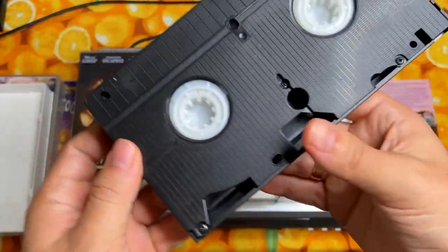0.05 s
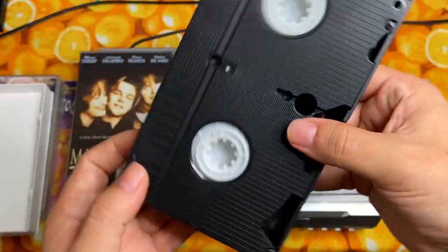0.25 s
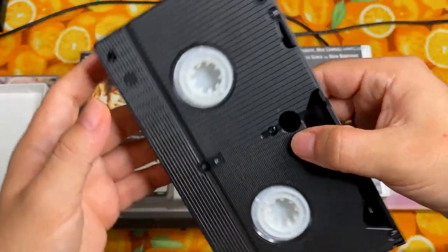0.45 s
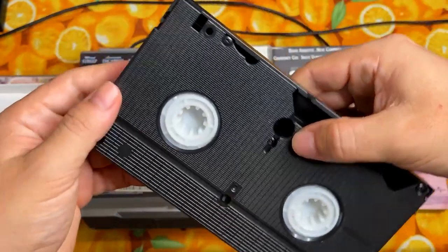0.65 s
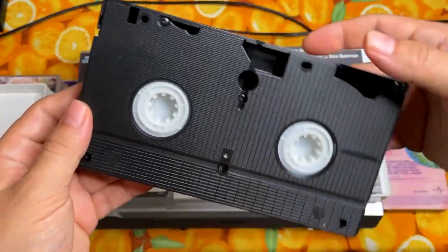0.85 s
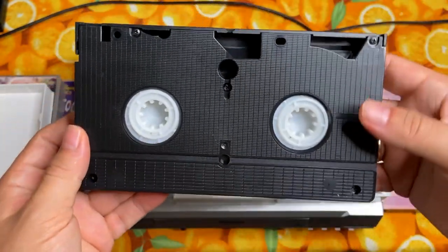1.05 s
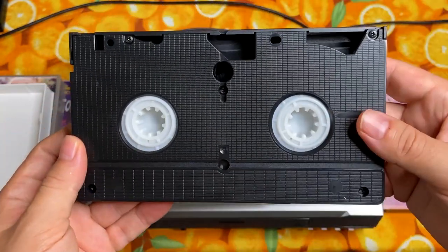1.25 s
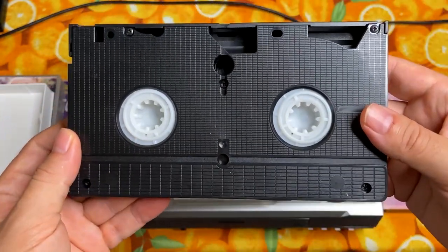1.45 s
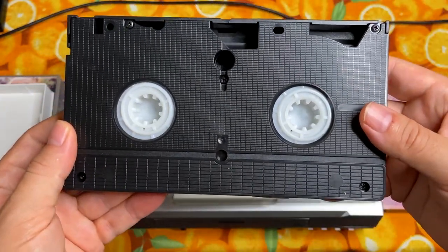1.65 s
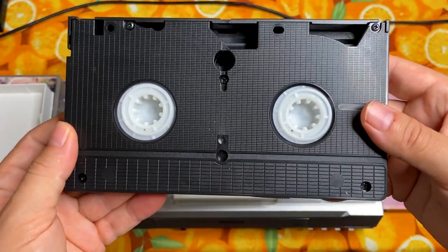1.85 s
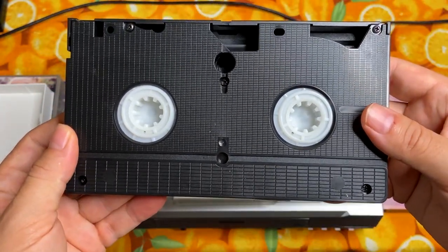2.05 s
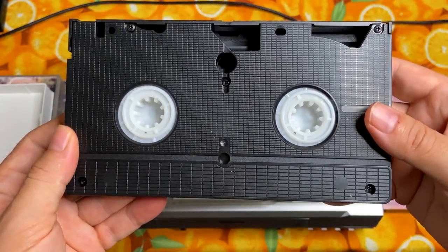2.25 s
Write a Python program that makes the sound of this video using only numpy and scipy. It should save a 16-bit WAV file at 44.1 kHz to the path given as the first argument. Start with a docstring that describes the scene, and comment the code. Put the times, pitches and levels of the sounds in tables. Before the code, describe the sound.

Hollow plastic clacks come from a videotape being handled near the microphone, with light rubbing and a dull bump. After the sharpest clack the handling dies down, leaving small ticks and the faint hiss of a small room.

```python
"""In a small quiet room, close above a table, a hollow plastic cassette is turned over in the hands.
Its loose reels and flap strike the shell, and each impact excites damped resonances. Fingers rub
by stick-slip friction, the hands bump it softly, and sliding plastic squeaks once. The table reflects
the clacks and the walls reverberate; under it all lie a low rumble, faint hiss and a thin whine."""
import sys
import numpy as np
from scipy import signal
from scipy.fft import rfft, irfft, next_fast_len
from scipy.io import wavfile
from scipy.ndimage import uniform_filter1d, map_coordinates

SR = 44100
rng = np.random.default_rng(int(sys.argv[2]) if len(sys.argv) > 2 else 0)


def waveform_to_disk(signal):
    """Save audio, clipped to [-1, 1], as 16-bit WAV at the path in sys.argv[1]."""
    frames = np.transpose(np.atleast_2d(signal))
    scaled = np.clip(frames, -1, 1) * 32767
    samples = np.round(scaled).astype(np.int16)
    wavfile.write(sys.argv[1], SR, samples)


N = 105840


def amp(db):
    """Decibels to gain."""
    return 10 ** (np.asarray(db) / 20)


def unit(x):
    """Normalisation to rms 1."""
    return x / np.sqrt(np.mean(x ** 2) + 1e-20)


def along(points, hz):
    """Interpolation of (Hz, value) points on a log axis."""
    f, v = np.transpose(points)
    return np.interp(np.log(hz + 1), np.log(f + 1), v)


def fade(t, t60):
    """Exponential decay by 60 dB in t60."""
    return np.exp(-np.log(1000) * t / np.maximum(t60, 1e-4))


def wobble(rate):
    """Spline interpolation of random knots, rate a second."""
    return map_coordinates(rng.standard_normal(N // 8), [np.arange(N) * rate / SR], mode="wrap")


def add(track, s, sound):
    """Superposition of a sound on a track at time s."""
    i = max(round(s * SR), 0)
    track[..., i:i + sound.shape[-1]] += sound[..., :max(N - i, 0)]


def filtered(x, response):
    """Linear filtering by a complex frequency response."""
    m = next_fast_len(N + SR // 2)
    return irfft(rfft(x, m) * response(np.fft.rfftfreq(m, 1 / SR)), m)[..., :N]


def coloured(x, points, size=16384):
    """Minimum-phase filter through (Hz, dB) points, for short sounds."""
    cepstrum = irfft(np.log(amp(along(points, np.fft.rfftfreq(size, 1 / SR)))))
    cepstrum[1:size // 2] *= 2
    cepstrum[size // 2 + 1:] = 0
    return irfft(rfft(x, size) * np.exp(rfft(cepstrum)))[:len(x)]


def noise(spectrum):
    """Spectral shaping of white noise; rms 1."""
    return unit(filtered(rng.standard_normal(N), lambda hz: amp(along(spectrum, hz))))


def dying(t60s, length, size):
    """Frequency-dependent damping of a noise burst."""
    hz, t, z = signal.stft(rng.standard_normal(length), SR, nperseg=size)
    return signal.istft(z * fade(t, along(t60s, hz)[:, None]), SR, nperseg=size)[1][:length]


def evened(x, order=121):
    """Whitening: flattens the broad spectrum, keeping its fine peaks; energy 1."""
    z = rfft(x, 2 * len(x))
    return irfft(z / np.sqrt(np.abs(uniform_filter1d(np.abs(z) ** 2, order)) + 1e-12))[:len(x)]


# rumble envelope (time [s], level [dB])
RUMBLE_LEVEL = [(0.0, -54.5), (0.08, -70), (0.16, -49), (0.37, -67), (0.63, -59), (0.68, -50),
                (0.89, -62.5), (1.14, -52.5), (1.43, -61.5), (1.49, -62.5), (2.32, -63.5), (2.4, -73.5)]
# its spectrum (frequency [Hz], density [dB])
RUMBLE = [(20, -24.5), (35, -9), (52, 1), (70, -2.5), (110, -10), (200, -21), (400, -57.5)]
def rumble(gain_db=-0.5):
    """Amplitude modulation: low noise swells and sinks."""
    level_db = np.interp(np.arange(N) / SR, *np.transpose(RUMBLE_LEVEL))
    return amp(level_db + gain_db) * noise(RUMBLE)


# hiss spectrum (frequency [Hz], density [dB])
HISS = [(50, -21.5), (120, -5), (170, -10), (370, -12.5), (500, -15.5), (1200, -26), (1750, -27.5),
        (2300, -30), (4000, -34), (7000, -35.5), (9000, -36.5), (12000, -40), (13500, -58), (16000, -69.5)]
# its stereo width (frequency [Hz], side over mid [dB])
HISS_WIDTH = [(100, -5.5), (300, -8.5), (900, -1.5), (4000, -12), (10000, -13.5)]
def hiss(mid_db=-68.5):
    """Partial coherence: the channels share one noise and take a second in opposite phase."""
    side = filtered(noise(HISS), lambda hz: amp(along(HISS_WIDTH, hz)))
    return amp(mid_db) * (noise(HISS) + np.array([side, -side]))


# whine tones (frequency [Hz], level [dB])
WHINE = [(1745, -82), (1700, -85.5)]
# their brief swell (time [s], gain [dB])
WHINE_SWELL = [(0, 0.5), (1.55, 0), (1.66, 5), (1.82, -1.5), (1.95, 0), (2.4, 0)]
def whine():
    """Phase modulation: two faint, close tones waver at random."""
    t = np.arange(N) / SR
    tones = sum(amp(db) * np.sqrt(2) * np.sin(2 * np.pi * hz * t + 0.91 * wobble(35))
                for hz, db in WHINE)
    return tones * amp(np.interp(t, *np.transpose(WHINE_SWELL)))


# rubbing strokes, and brief soft noise just before two clacks (start [s], duration [s], level [dB])
RUBS_AND_PUFFS = [(0.053, 0.046, -51.5), (0.118, 0.022, -50.5), (0.151, 0.086, -53), (0.273, 0.16, -60.5),
                  (0.395, 0.021, -47.5), (0.537, 0.049, -60), (0.571, 0.064, -54.5), (0.647, 0.021, -46),
                  (0.725, 0.05, -58.5), (.812, .02, -58.5), (.84, 0.057, -62.5), (0.888, 0.00428, -43.5),
                  (1.088, 0.028, -51), (1.162, 0.05, -58)]
# their spectrum (frequency [Hz], density [dB])
RUB_SPECTRUM = [(100, -7), (300, 8), (500, -0.5), (800, 2), (2000, -1.5), (4500, -9.5), (8000, -15.5),
                (11500, -17.5), (15000, -38)]
def rubbing(rise_s=.008, fall_s=.035, grains_per_s=900, grain_db=2):
    """Friction noise: grainy rubbing strokes; the same noise also sounds briefly before two clacks."""
    t = np.arange(N) / SR
    envelope = np.zeros(N)
    for start, length, db in RUBS_AND_PUFFS:
        rise = np.clip((t - start) / rise_s, 0, 1)
        fall = np.clip((start + length - t) / fall_s + .5, 0, 1)
        envelope += amp(db) * rise * fall
    grainy = unit(noise(RUB_SPECTRUM) * amp(grain_db * wobble(grains_per_s)))
    return room(envelope * grainy)[:, :N]


# room decay (frequency [Hz], T60 [s])
ROOM_T60 = [(100, 0.473), (400, 0.25), (1500, 0.35), (5000, 0.27), (12000, .36)]
# reverberation over direct sound (frequency [Hz], level [dB])
ROOM_DB = [(100, -3.5), (400, -10), (1500, -11.5), (5000, -10), (12000, -11.5)]
def room(sound, rise_s=0.004, side_db=-8.5):
    """Reverberation: wall reflections add a diffuse stereo tail to the direct sound."""
    t = np.arange(SR // 2) / SR
    onset = 1 - np.exp(-t / rise_s)
    mid, side = [evened(dying(ROOM_T60, len(t), size=256) * onset) for _ in range(2)]
    tails = [coloured(mid + sign * amp(side_db) * side, ROOM_DB, size=32768) for sign in (1, -1)]
    return np.array([signal.fftconvolve(sound, tail + (t == 0)) for tail in tails])


# impacts of loose parts (time [s], level [dB], gains of lows, low mids, upper mids, treble, top [dB],
# shell T60 factor [ratio], then for two resonances of the struck spot: frequency [Hz], level [dB])
IMPACTS = [(.068, -54.5, 21, 10.5, 5.5, 6, 12, 1.1, 282, -17.5, 1790, -7.5),
           (.1347, -38.5, 2.5, 4, 5, 4, 0, 0.59, 1804, -4.5, 3190, -11.5),
           (.186, -51.5, 19, 10.5, -3.5, -6, 11, 1.5, 758, -8.5, 5260, -9),
           (.198, -57.5, 16.5, -2, -2, -4, 14, 2.4, 850, -2.5, 4340, 2),
           (0.331, -39, 2, 2.5, -3.5, -3.5, 9, 1.27, 304, -11, 4680, -9),
           (0.41, -35.5, 4.5, -1, -2.5, -1.5, 1.5, .95, 356, -12, 3410, -12),
           (0.548, -58, -40.5, 0.5, 1.5, -15, 4, 2.1, 780, 0, 2650, -7.5),
           (0.6132, -48.5, -5.5, 11, 7, 2, 0, 1.7, 836, -2.5, 1875, -4),
           (.655, -43, 10, 5, -5.5, -1, -3.5, 2, 365.4, -9.5, 1900, -3),
           (.664, -34, 7, -5.5, 1.5, -1, -5.5, 0.79, 1440, -9.5, 1900, -3),
           (0.6694, -40.5, 4.5, 2.5, -7, 1.5, 2.5, .95, 830, 0, 2550, -2.5),
           (.9003, -33.5, -12.5, -3.5, -1, -4, -5, .75, 1106, -7, 1970, -3),
           (.9036, -36, -12.5, -3, -2.5, -5.5, -8, 0.64, 1170, -6, 1872, -3.5),
           (0.9934, -37.5, -8, -2, -1, -5, -11, 1.07, 297, -8.5, 1039, -3.5),
           (1.102, -30, -9.5, 0.5, -5, 2.5, -5, 0.79, 1058, -3, 394, -9.5),
           (1.3383, -53, 14, 7.5, -2, 0, 9, 0.9, 384, -10.5, 4430, -8),
           (1.614, -77, 12, 13.5, -5.5, -11, 1.5, 2.6, 1085, -1, 2640, 4),
           (2.217, -56.5, -9, 1, 0.5, -14, -0.5, 1.25, 668, -5, 4780, -4),
           (2.247, -74.5, -0.5, 5, 1.5, -11, -10, 1.6, 1050, -6, 1760, -0.5)]
# bands of those gains, with a 0 dB reference third (frequency [Hz])
COLOUR_HZ = [290, 700, 1250, 2200, 3800, 10000]
# shell modes (frequency [Hz], level [dB], base T60 [s])
SHELL_MODES = [(300.3, -10.5, 0.09), (376.6, -19, 0.17), (615, -5, 0.051), (668, -12.5, 0.11),
               (756.8, -7, 0.14), (841, -6, .07), (929.6, -9.5, 0.12), (1046.3, -1.5, .05),
               (1161.5, 4.5, 0.033), (1489, -5.5, 0.059), (1825, -3, 0.068), (1900, -0.5, 0.037),
               (2690, -2.5, .05), (2964, -4, 0.044), (3290, 0.5, 0.058), (4266, -3.5, .03),
               (6133, -2, .025), (6772, -8, .025), (7290, -8.5, 0.02)]
# its dense upper resonances (frequency [Hz], density [dB])
DENSE_SPECTRUM = [(100, -8.5), (200, -9), (300, -12.5), (490, -15), (640, 3.5), (1100, 0), (2000, -1.5),
                  (3300, -3.5), (5000, -7), (7200, -15.5), (9000, -16.5), (11500, -21.5), (13500, -37.5),
                  (16000, -40.5)]
# their decay (frequency [Hz], base T60 [s])
DENSE_T60 = [(300, 0.14), (1200, 0.052), (4000, .026), (11000, 0.02)]
def clacks(contact_s=0.0005, modes_db=-2.5, dense_db=-1, table_delay_s=.0036, table_db=-14.5):
    """Free vibration after impact: shell and struck spot ring; the table reflects the dense burst."""
    out, t = np.zeros((2, N)), np.arange(SR // 5) / SR
    onset = 1 - np.exp(-t / contact_s)
    equal_energy = lambda x: x * np.sqrt(SR / 50 / np.sum(x ** 2))
    mode = lambda hz, t60: onset * fade(t, t60) * np.sin(2 * np.pi * hz * t)
    spot_mode = lambda hz: equal_energy(mode(hz, 0.032 * (1000 / hz) ** 0.78))  # higher dies sooner
    for start, db, low, low_mid, high_mid, treble, top, stretch, hz_a, db_a, hz_b, db_b in IMPACTS:
        ring = sum((-1) ** k * amp(level + rng.normal(0, 1.5)) * mode(hz, t60 * stretch)
                   for k, (hz, level, t60) in enumerate(SHELL_MODES))
        spot = amp(db_a) * spot_mode(hz_a) + amp(db_b) * spot_mode(hz_b)
        burst = onset * dying([(hz, t60 * stretch) for hz, t60 in DENSE_T60], len(t), size=64)
        reflection = amp(table_db) * np.interp(t - table_delay_s, t, burst, left=0)
        dense = coloured(evened(burst + reflection, order=161), DENSE_SPECTRUM)
        hit = amp(modes_db) * equal_energy(ring) + amp(dense_db) * equal_energy(dense) + spot
        colour = list(zip(COLOUR_HZ, [low, low_mid, 0, high_mid, treble, top]))
        add(out, start, room(amp(db) * coloured(hit, colour)))
    return out


# hand bumps and low room resonances (time [s], level [dB], frequency [Hz], T60 [s])
LOW_TONES = [(0.134, -63, 135, .2), (0.149, -53, 70, .35), (0.331, -59, 75.7, 0.14), (0.412, -51, 127.7, 0.34),
             (.425, -45, 194, 0.15), (.595, -52, 135, .3), (.615, -54, 195, .12), (0.667, -31.5, 118, .1),
             (.678, -35, 84, 0.14), (0.702, -45, 54.5, 0.81), (1.135, -50.5, 134.4, 0.62),
             (1.349, -54.5, 294, 0.24)]
def low_tones(rise_s=0.0027):
    """Damped oscillation: soft bumps of a hand on the cassette, and the room's low resonances, each start one
    low tone."""
    out, t = np.zeros(N), np.arange(SR) / SR
    onset = 1 - np.exp(-t / rise_s)
    for start, db, hz, t60 in LOW_TONES:
        add(out, start, amp(db) * onset * fade(t, t60) * np.sin(2 * np.pi * hz * t))
    return out


# squeak envelope (time [s], level [dB])
SQUEAK = [(0.9, -54.5), (0.922, -60), (0.968, -62.5), (1.02, -70.5)]
# scrape spectrum (frequency [Hz], density [dB])
SCRAPE = [(2000, -27), (5000, 4), (7400, 3.5), (9000, -5), (11000, -1), (15000, -16)]
def squeak(centre_hz=7400, waver_hz=260, tone_db=2, scrape_db=1.5, edge_s=.02):
    """Friction-induced vibration: sliding plastic gives a thin, wavering tone in a bright scrape."""
    t = np.arange(N) / SR
    times, db = np.transpose(SQUEAK)
    gate = np.clip(np.minimum(t - times[0], times[-1] - t) / edge_s, 0, 1)
    hz = centre_hz + waver_hz * wobble(600)
    tone = amp(tone_db) * np.sin(2 * np.pi * np.cumsum(hz) / SR)
    return gate * amp(np.interp(t, times, db)) * (tone + amp(scrape_db) * noise(SCRAPE))


def scene():
    """Superposition: the sounds of handling add to the quiet background."""
    return clacks() + rubbing() + low_tones() + squeak() + rumble() + hiss() + whine()


# phase between the microphone ports (frequency [Hz], lead of the left [rad])
PORT_PHASE = [(0, 0), (1000, .1), (3200, .55), (4200, .15), (7000, 0), (7600, -.7), (8900, -3.1),
              (11100, -6.3), (13300, -9.4), (16000, -13)]
# their balance (frequency [Hz], left minus right [dB])
PORT_BALANCE = [(100, .5), (700, -.5), (1100, -1.8), (1850, -1.8), (2300, 1.5), (4000, .8), (8000, 0)]
def record(dry, low_cut_hz=35, top_hz=15900):
    """Band-limited stereo pickup: two microphone ports differ in phase and level."""
    half = np.array([[.5], [-.5]])
    gain = lambda hz: amp(half * along(PORT_BALANCE, hz))
    phase = lambda hz: half * np.interp(hz, *np.transpose(PORT_PHASE))
    cut = signal.sosfilt(signal.butter(2, low_cut_hz, "highpass", fs=SR, output="sos"), dry)
    return filtered(cut, lambda hz: gain(hz) * np.exp(1j * phase(hz)) * (hz < top_hz))


dry = scene()
out = record(dry)
waveform_to_disk(out)
```